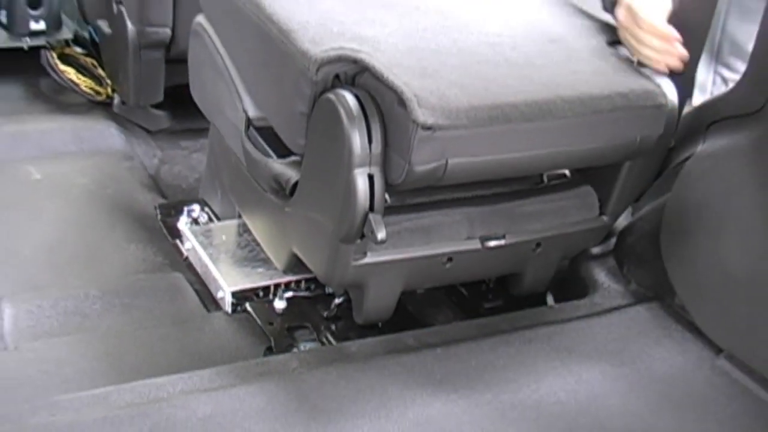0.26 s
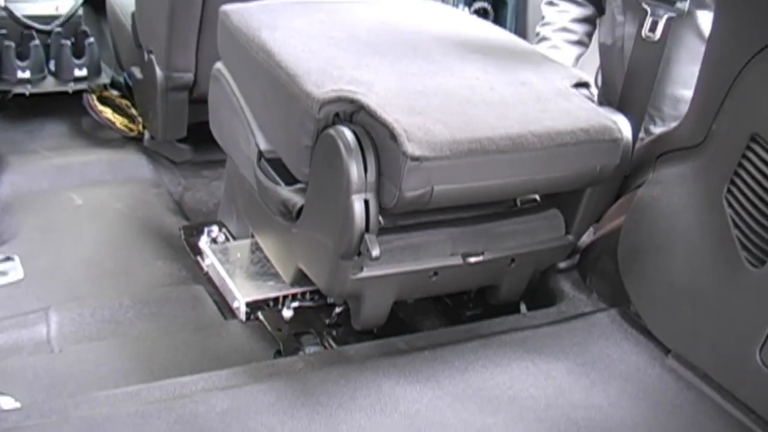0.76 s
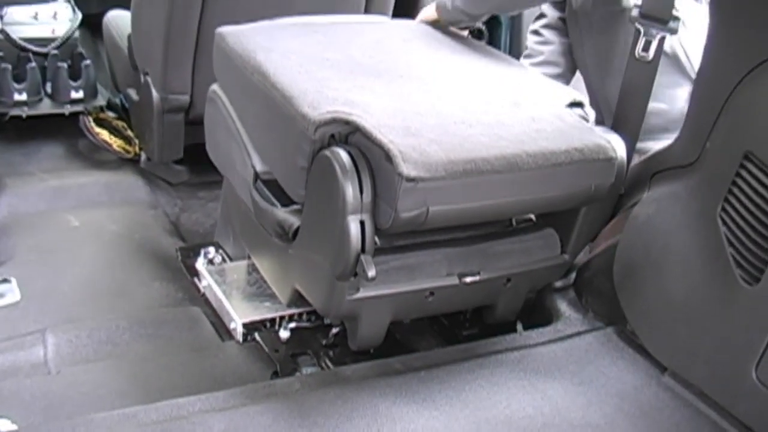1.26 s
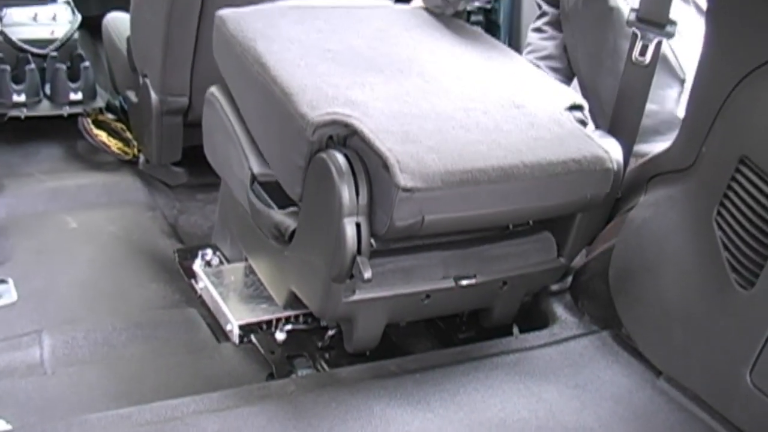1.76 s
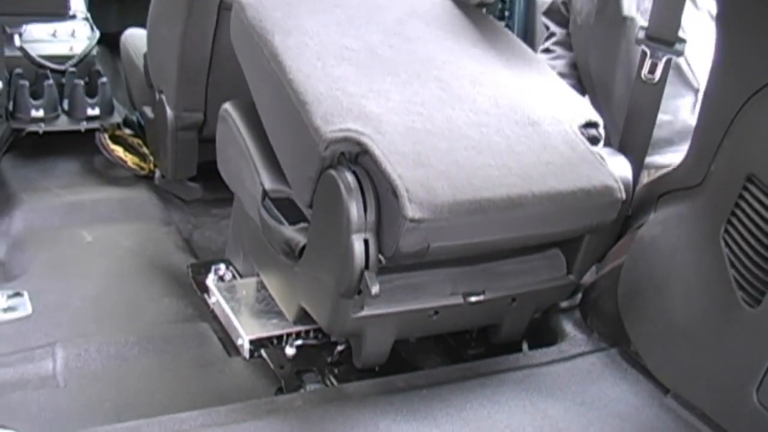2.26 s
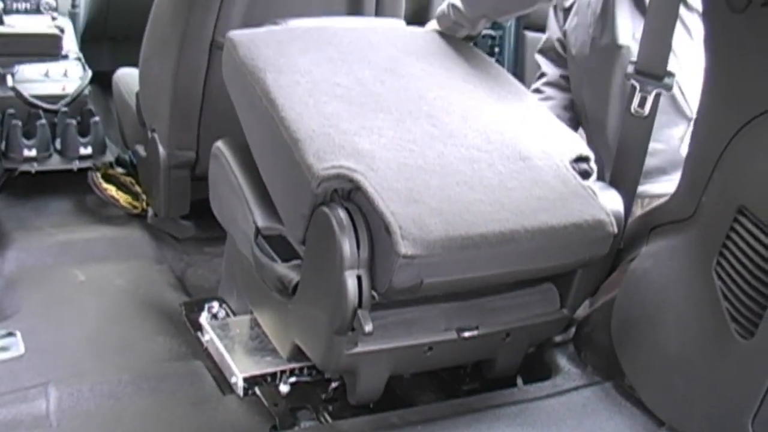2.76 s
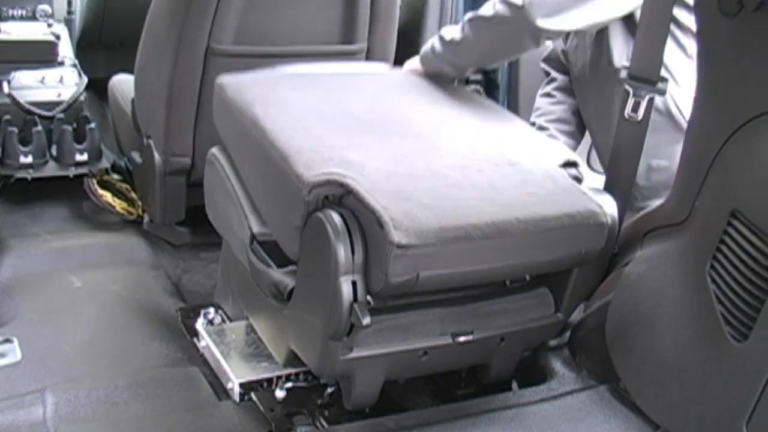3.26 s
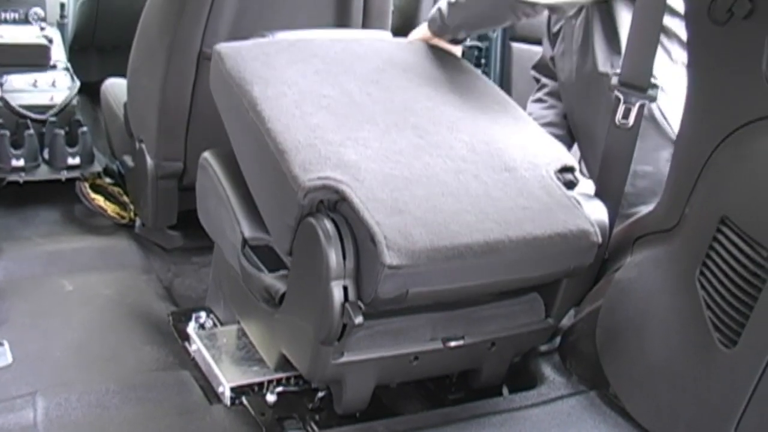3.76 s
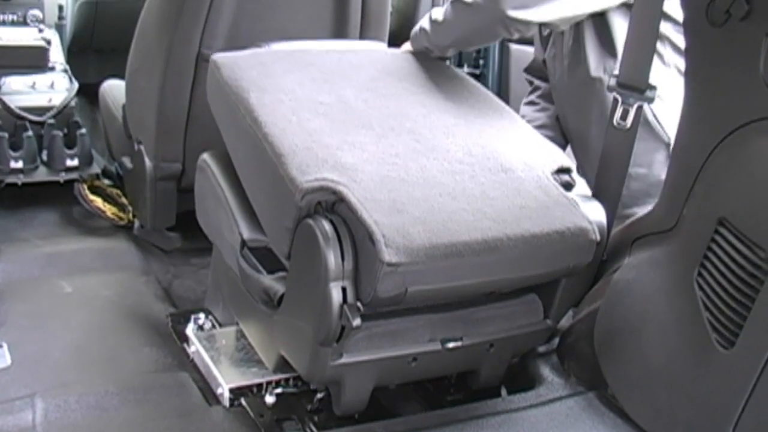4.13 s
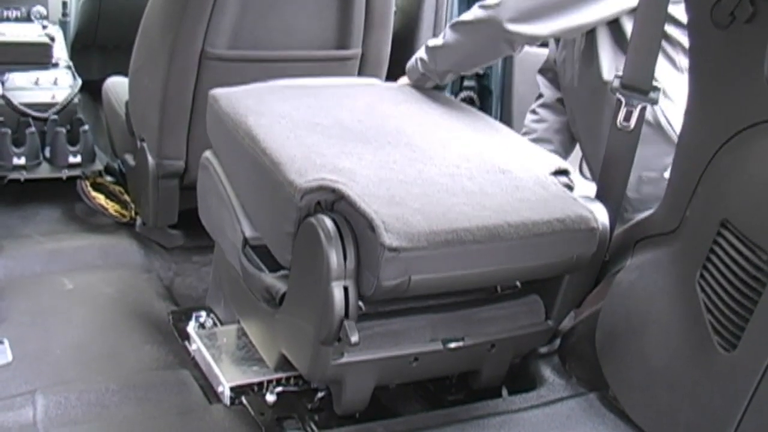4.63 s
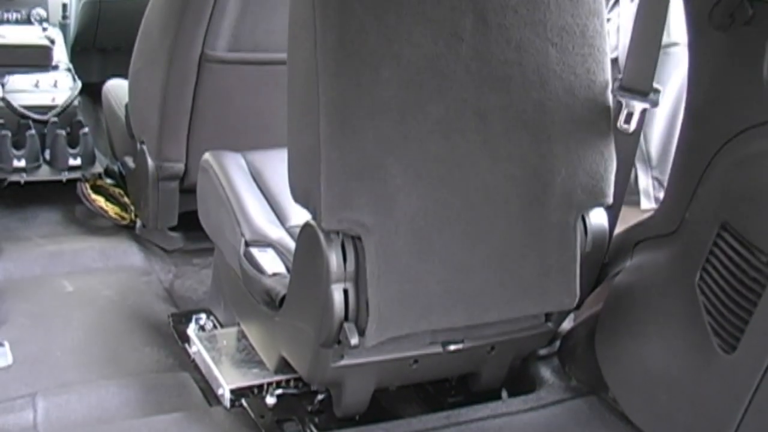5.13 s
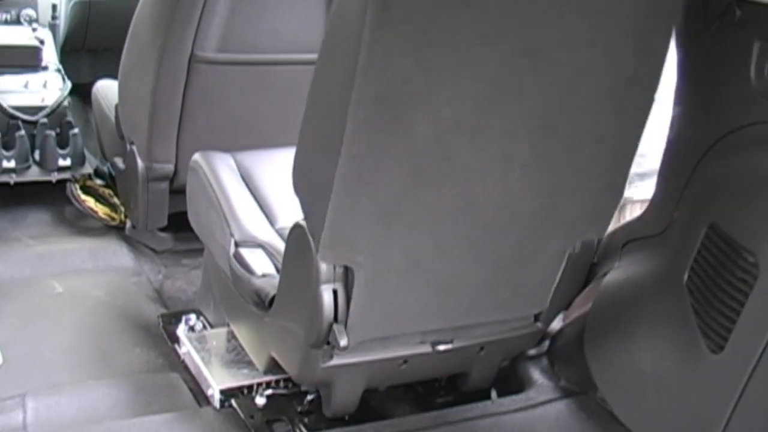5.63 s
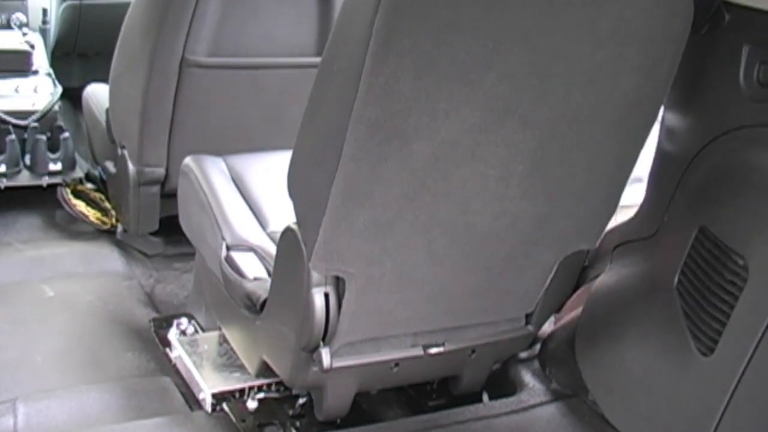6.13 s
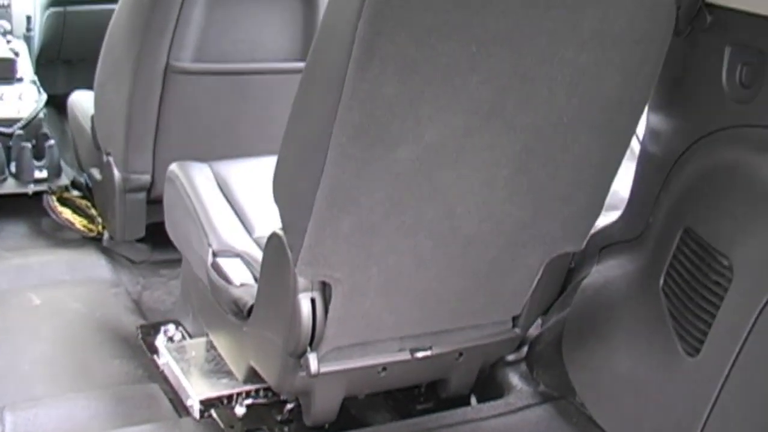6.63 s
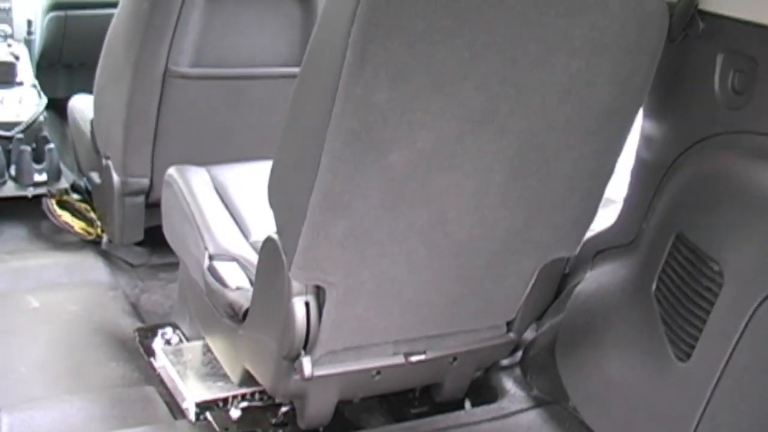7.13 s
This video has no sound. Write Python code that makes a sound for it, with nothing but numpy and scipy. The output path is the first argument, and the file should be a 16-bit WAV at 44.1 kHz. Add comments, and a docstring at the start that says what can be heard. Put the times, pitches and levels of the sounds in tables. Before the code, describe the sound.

Inside a van, a folding seat lands with a heavy, overloaded clunk that booms through the floor and jangles loose metal. Fabric and a sleeve rustle while hinges tick and the backrest knocks its stops, with a sharp latch clank midway. It swings up with a quick dull shudder, bangs into its catch, rings briefly, then locks with a final thud. Close mono microphone, faint low hum.

```python
"""A heavy clunk comes first: a van's folding rear seat drops onto the floor, which booms and jangles.
Its backrest is then rocked against its stops, swings up with a shudder, bangs into the catch and locks.
Impacts sum struck modes, decaying thuds and filtered noise; cloth is grainy noise in swelling strokes.
A wavering hum lies beneath; a close microphone inside the cabin hears it in mono and overloads on the clunk."""
import sys
import numpy as np
from scipy import signal
from scipy.fft import rfft, irfft, next_fast_len
from scipy.io import wavfile
from scipy.ndimage import uniform_filter1d, map_coordinates

SR = 44100
rng = np.random.default_rng(int(sys.argv[2]) if len(sys.argv) > 2 else 0)


def dump_mix(stems):
    """Bounce the given channels to the path in sys.argv[1] as a 16-bit WAV at rate SR."""
    frames = np.atleast_2d(stems).T  # one column per channel
    limited = np.clip(frames, -1, 1)  # hard clip at full scale
    pcm = np.round(limited * 32767).astype(np.int16)
    wavfile.write(sys.argv[1], SR, pcm)


N = 325899
TIME = np.arange(N) / SR  # the whole scene, s
RING = np.arange(2 ** 13) / SR  # time axis of one impact, s


def amp(db):
    """Logarithmic level: decibels become an amplitude ratio."""
    return 10 ** (np.asarray(db) / 20)


def unit(x):
    """Power normalisation: a steady sound is scaled to rms 1."""
    return x / np.sqrt(np.mean(x ** 2) + 1e-20)


def burst(x):
    """Energy normalisation: an impact is given the energy of 10 ms at rms 1."""
    energy_of_10_ms = SR / 100
    return x / np.sqrt(np.sum(x ** 2) / energy_of_10_ms + 1e-20)


def along(points, hz):
    """Logarithmic frequency scale: (Hz, value) points are interpolated on it."""
    f, value = np.transpose(points)
    return np.interp(np.log(hz + 1), np.log(f + 1), value)


def curves(rows):
    """Linear interpolation in time: one value per sample for each column after the time."""
    s, *columns = np.transpose(rows)
    return [np.interp(TIME, s, column) for column in columns]


def wobble(rate):
    """Slow random modulation: a smooth curve through random knots, rate of them a second."""
    knots = rng.standard_normal(int(N * rate / SR) + 4)
    return map_coordinates(knots, [TIME * rate])


def add(track, s, sound):
    """Superposition: a sound is mixed into the track at time s."""
    part = track[max(round(s * SR), 0):][:len(sound)]
    part += sound[:len(part)]


def coloured(x, spectrum):
    """Minimum-phase filtering: folding the cepstrum makes the filter with this spectrum causal."""
    size = 2 * next_fast_len(len(x) // 2 + 1)
    gain = amp(along(spectrum, np.fft.rfftfreq(size, 1 / SR)))
    cepstrum = irfft(np.log(gain))
    cepstrum[1:size // 2] *= 2
    cepstrum[size // 2 + 1:] = 0
    response = np.exp(rfft(cepstrum))
    return irfft(rfft(x, size) * response)[:len(x)]


def fade(t, t60):
    """Exponential damping: the amplitude falls by 60 dB in t60 seconds."""
    return np.exp(-np.log(1000) * t / t60)


def ring(modes, attack, t=RING, scatter_db=2):
    """Modal synthesis: damped sines with random phases, struck at new strengths each time."""
    hz, db, t60 = np.transpose(modes)[:, :, None]
    gain = amp(db + scatter_db * rng.standard_normal(hz.shape))
    phase = 2 * np.pi * rng.random(hz.shape)
    partials = gain * fade(t, t60) * np.sin(2 * np.pi * hz * t + phase)
    onset = 1 - np.exp(-t / attack)
    return burst(partials.sum(0) * onset)


def clatter(spectrum, scrape, t60, spiky=0.54, t=RING):
    """Stochastic excitation of dense modes: parts chatter while they scrape, then the sound decays."""
    force = rng.standard_normal(len(t)) * np.exp(spiky * rng.standard_normal(len(t)))
    decay = fade(np.maximum(t - scrape, 0), t60)
    return burst(coloured(force * decay, spectrum))


def thud(hz, cycles, attack):
    """Damped mass-spring oscillator: the padded seat bounces on its mounts, losing 60 dB in these cycles."""
    onset = 1 - np.exp(-RING / attack)
    return burst(np.sin(2 * np.pi * hz * RING) * fade(RING, cycles / hz) * onset)


# Course of the hum's strength: t/s, relative level/dB
HUM_COURSE = [(0.4, -45.5), (0.8, -48), (3.2, -49), (4.1, -47), (4.75, -44), (6.3, -47.5), (7.39, -52)]
# Spectrum of the rumble and faint hiss: f/Hz, relative level/dB
RUMBLE_SPECTRUM = [(20, -19), (40, -4.5), (72, 1), (120, -9), (225, -15.5), (300, -25), (490, -26.5),
                   (900, -34), (2500, -43.5), (15000, -65)]


def hum():
    """Random amplitude and phase modulation: a wavering low drone in broadband rumble and faint hiss."""
    level_db, = curves(HUM_COURSE)
    swell = amp(-4.5 + 2 * wobble(2.87))
    tone = swell * np.sin(2 * np.pi * 70 * TIME + 1.0 * wobble(3.4))
    rumble = amp(2.0) * unit(coloured(rng.standard_normal(N), RUMBLE_SPECTRUM))
    return amp(level_db) * (tone + rumble)


# Reverberation time of the cabin: f/Hz, t60/s
CABIN_DECAY = [(80, 0.48), (400, 0.25), (1500, 0.13), (5000, 0.19), (14000, 0.14)]


def cabin(x):
    """Diffuse reverberation: convolution with decaying noise, longest in the bass of the carpeted cabin."""
    noise = rng.standard_normal(2 * len(RING))
    hz, t, z = signal.stft(noise, SR, nperseg=256)
    decay = fade(t, along(CABIN_DECAY, hz)[:, None])
    tail = signal.istft(z * decay, SR, nperseg=256)[1]
    tail = tail * (1 - np.exp(-np.arange(len(tail)) / SR / 0.0033))  # the reflections build up
    return signal.fftconvolve(x, tail / np.linalg.norm(tail))[:N]


# Strokes of the arm: peak t/s, rise/s, fall/s, relative upholstery level/dB, relative sleeve level/dB
ARM_STROKES = [(.34, 0.24, .15, -53.5, -51), (.8, .22, 0.66, -59, -54), (1.59, 0.63, 0.27, -58.5, -50),
               (2.125, 0.24, 0.097, -54.5, -50.5), (2.34, 0.084, 0.11, -63, -55),
               (2.6, 0.29, 0.26, -66, -57), (2.82, 0.089, 0.14, -60.5, -56), (3.27, 0.28, 0.24, -57.5, -54),
               (3.48, .043, 0.043, -56.5, -48.5), (3.65, 0.14, 0.23, -53, -49),
               (4.32, 0.19, 0.06, -59, -53.5), (4.56, 0.25, .18, -57, -52), (4.84, 0.13, .21, -45, -47),
               (5.16, .065, .11, -56.5, -48), (5.31, .09, 0.15, -69, -59.5),
               (5.655, .14, .115, -53.5, -48.2), (6.08, 0.08, 0.025, -57, -55.5),
               (6.4, .31, 0.6, -60.5, -57), (6.86, .03, .04, -74, -60.5)]
# The arm at rest: relative upholstery level/dB, relative sleeve level/dB
ARM_AT_REST = (-65, -72.5)
STROKE_EDGE_DB, STROKE_SHAPE = 10, 1.44  # level lost over the rise or fall time; roundness of the swell


def stroke_levels():
    """Addition of powers: every stroke swells and dies away over the resting arm; levels in dB."""
    t = TIME[::100]
    power = amp(ARM_AT_REST)[:, None] ** 2
    for s, rise, fall, *levels_db in ARM_STROKES:
        away = np.maximum((s - t) / rise, (t - s) / fall)
        stroke_db = np.array(levels_db)[:, None] - STROKE_EDGE_DB * away ** STROKE_SHAPE
        power = power + amp(stroke_db) ** 2
    return curves(np.column_stack([t, *(10 * np.log10(power))]))


def rub(spectrum, patchy_db, grain):
    """Stick-slip friction: fibres catch and slip as grainy noise whose colour drifts in patches."""
    slips = rng.standard_normal(N) * np.exp(grain * rng.standard_normal(N))
    z = signal.stft(slips, nperseg=512)[2]
    patches = uniform_filter1d(rng.standard_normal(z.shape), size=16, axis=0)  # across frequency
    patches = uniform_filter1d(patches, size=14, axis=1)  # across time
    patchy = signal.istft(z * amp(patchy_db * unit(patches)), nperseg=512)[1][:N]
    return unit(coloured(patchy, spectrum))


# Friction spectrum of the seat cover: f/Hz, relative level/dB
COVER_SPECTRUM = [(100, -1.5), (330, 8.5), (520, 8), (800, 1), (1800, -2.5), (3500, -6), (8000, -15),
                  (15000, -29)]
# Friction spectrum of the jacket sleeve: f/Hz, relative level/dB
SLEEVE_SPECTRUM = [(800, -16), (2300, -3.5), (4200, 0.5), (7000, -1), (10300, 2), (15500, -0.5)]


def cloth():
    """Friction noise: upholstery scuffs dully and a jacket sleeve hisses as the arm works the backrest."""
    upholstery_db, sleeve_db = stroke_levels()
    scuffs_db = 1.0 * wobble(25) + 1.6 * wobble(140)
    cover_gain = amp(upholstery_db + 2.5 + scuffs_db)
    sleeve_gain = amp(sleeve_db + 2.5 + 0.51 * wobble(18))
    cover = cover_gain * rub(COVER_SPECTRUM, patchy_db=1.13, grain=0.62)
    sleeve = sleeve_gain * rub(SLEEVE_SPECTRUM, patchy_db=2.0, grain=0.51)
    return cover + sleeve


# Small ticks of hinges and springs: t/s, level/dB, centre f/Hz
SETTLING_TICKS = [(0.143, -44.5, 11000), (0.7621, -47, 1190), (0.959, -50.5, 1180), (1.783, -47, 647),
                  (1.866, -54, 2000), (2.442, -50, 11000), (2.443, -52.5, 450), (2.857, -57, 2000),
                  (2.938, -56, 900), (3.154, -53, 550), (3.572, -53.5, 3220), (3.8403, -48.5, 3200),
                  (4.003, -63, 1200), (4.037, -63, 3000), (4.177, -53.5, 3000), (4.585, -49, 3500),
                  (4.678, -48.5, 1200), (5.039, -45, 1100), (5.8744, -57.5, 4900), (5.9178, -57.5, 4900)]
RETICK_S, RETICK_LOSS_DB = 0.0051, 12.5  # delay and weakening of the second tick


def ticks():
    """Band-limited impulses: hinges and springs settle in dry double ticks, each around its own pitch."""
    out = np.zeros(N)
    for s, db, hz in SETTLING_TICKS:
        colour = [(hz / 8, -26), (hz / 2, -5), (hz, 0), (hz * 2, -8), (hz * 8, -30)]
        for k in range(2):
            tick = clatter(colour, scrape=0.00086, t60=0.0081)
            add(out, s + k * RETICK_S, amp(db - k * RETICK_LOSS_DB) * tick)
    return out


# The latch hook strikes its steel bar: t/s, level/dB, upper limit of the force f/Hz
LATCH_STRIKES = [(2.0807, -35, 800), (3.6839, -17.5, 5000)]
# Modes of the hook: f/Hz, relative level/dB, t60/s
HOOK_MODES = [(933, 1, 0.026), (1197, -9, .025), (1367, 3.5, 0.034), (2360, -2, .022), (3300, -7, 0.05),
              (3700, -5, 0.033), (4380, -16, 0.023)]


def latch():
    """Force bandwidth: the hook clanks on its bar, and a softer contact reaches only the lower modes."""
    out = np.zeros(N)
    for s, db, top_hz in LATCH_STRIKES:
        modes = []
        for hz, level_db, t60 in HOOK_MODES:
            modes.append((hz, level_db - 10 * np.log10(1 + (hz / top_hz) ** 6), t60))
        add(out, s, amp(db) * ring(modes, attack=0.00073, scatter_db=1))
    return out


# Tones of the backrest: onset t/s, f/Hz, level/dB, t60/s
BACKREST_TONES = [(5.248, 274.5, -53, 65), (5.727, 439.5, -15, 0.11), (5.742, 185.7, -47.5, 3.4),
                  (5.738, 160, -37.5, 1.74)]


def backrest():
    """Free vibration, then added damping: shell and springs ring on until the last blow locks them."""
    out = np.zeros(N)
    for s, hz, db, t60 in BACKREST_TONES:
        add(out, s, amp(db) * np.sin(2 * np.pi * hz * TIME) * fade(TIME, t60))
    locked_s = BACKREST_KNOCKS[-1][0]
    return out * fade(np.maximum(TIME - locked_s, 0), t60=0.11)


# Modes of the plastic trim panel: f/Hz, relative level/dB, t60/s
PANEL_MODES = [(376, -5, 0.05), (435, 2, 0.043), (490, -5.5, 0.069), (534, -2, 0.039), (619, -0.5, 0.029),
               (793, -10.5, 0.062)]
# Modes of the steel frame: f/Hz, relative level/dB, t60/s
FRAME_MODES = [(1087, -3, 0.087), (1215, 6.5, 0.032), (1543, -7, 0.041), (1940, -1, 0.023), (2260, 6, 0.04),
               (2990, -5.5, 0.021), (3520, -10, 0.15), (4940, -9, .08)]
# Dense-mode spectra of padding, trim and steel, and of the contact snap: f/Hz, relative level/dB
PADDING_SPECTRUM = [(25, -19.5), (55, -3), (150, 4.5), (260, -3.5), (400, -20), (900, -36), (3000, -62)]
TRIM_SPECTRUM = [(100, -16), (280, 1.5), (480, 1.5), (680, -3.5), (1000, -14), (3000, -47.5)]
STEEL_SPECTRUM = [(300, -28), (750, 0), (1300, 3), (2400, 1), (3800, -3.5), (6000, -11.5), (10000, -22),
                  (15000, -28)]
SNAP_SPECTRUM = [(600, -31), (2000, -4), (3600, 5), (5500, 2), (8000, -1), (11000, -0.5), (15500, -7.5)]
SNAP_SHARE = 0.45  # part of the scrape during which the contact snaps
PANEL_DULLS, SNAP_DULLS = 0.41, 1.4  # dB lost by trim and snap per dB that the frame loses


def blow(thud_db, thud_hz, panel_db, steel_db, snap_db, scrape, lag=0, dull_db=0):
    """Impact excitation: the contact snaps and shakes the steel; padded mass and trim follow after the lag."""
    mass = thud(thud_hz, cycles=7.6, attack=0.00082)
    mass = mass + amp(-4.5) * clatter(PADDING_SPECTRUM, scrape, t60=0.088)
    panel = amp(-3) * ring(PANEL_MODES, attack=0.00062)
    panel = panel + amp(-1.5) * clatter(TRIM_SPECTRUM, scrape, t60=0.046)
    frame = amp(-9.5) * ring(FRAME_MODES, attack=0.0007)
    frame = frame + amp(-1.5) * clatter(STEEL_SPECTRUM, scrape, t60=0.062)
    snap = clatter(SNAP_SPECTRUM, SNAP_SHARE * scrape, t60=0.033, spiky=0.48)
    bite = 1 - np.exp(-RING / 0.0012)  # the contact force builds up
    hard = amp(steel_db - dull_db) * frame + amp(snap_db - SNAP_DULLS * dull_db) * snap
    soft = amp(thud_db - 1.5) * mass + amp(panel_db - PANEL_DULLS * dull_db) * panel
    out = bite * hard
    add(out, lag, soft)
    return out


# Strongest jolt, before pitch scatter: relative thud level/dB, thud f/Hz, then relative levels of
# trim panel/dB, steel frame/dB and snap/dB, scrape/s (negative: no scraping)
STRONGEST_JOLT = (-20, 130, -44.5, -66, -72, -0.1)
SHUDDER_S, JOLT_GAP_S = 5.183, 0.0205  # first jolt; time between jolts
SHUDDER_EDGE_DB, JOLT_SPREAD = 11, 0.3  # thud weaker at first and last jolt; scatter of log pitch


def shudder(count=5):
    """Periodic impacts: the rising backrest gives evenly spaced dull jolts whose thuds swell and fade."""
    out = np.zeros(N)
    thud_db, thud_hz, *parts = STRONGEST_JOLT
    for k, place in enumerate(np.linspace(-1, 1, count)):
        hz = thud_hz * np.exp(JOLT_SPREAD * rng.standard_normal())
        jolt = blow(thud_db - SHUDDER_EDGE_DB * place ** 2, hz, *parts)
        add(out, SHUDDER_S + k * JOLT_GAP_S, jolt)
    return out


# Knocks of the backrest: t/s, play/s, first touch relative to the knock/dB, body lag/s,
# relative thud level/dB, thud f/Hz, relative levels of trim panel/dB, steel frame/dB and snap/dB,
# scrape/s, rebound relative to the knock/dB
BACKREST_KNOCKS = [(1.729, .015, -9, 0, -40, 194, -45.5, -45, -46, 0.013, -8),
                   (1.755, .007, -14, 0.0003, -42.5, 185, -44.5, -46.5, -48.5, .011, -4),
                   (2.079, .015, -10.5, 0.0015, -35.5, 209, -36.5, -37, -52, 0.0065, -10),
                   (2.3041, .015, -11, 0.012, -35.5, 198, -30.5, -35.5, -36, 0.021, -9),
                   (2.787, 0.0062, -12, .009, -33, 151, -43.5, -46, -45.5, .009, -12),
                   (2.829, 0.0036, -11, 0, -45, 190, -45, -48.5, -64, 0.0097, -12),
                   (3.3378, 0.0051, -14, 0.0033, -25.5, 118, -33.5, -42.5, -35, 0.0088, -12),
                   (3.6848, 0.0069, -8.5, .003, -21, 121, -24.5, -22, -26.5, 0.018, -3),
                   (4.2145, 0.0088, -17.5, 0.0065, -34, 200, -26.5, -31.5, -30, .011, -15),
                   (4.406, .005, -7.5, .002, -34.5, 199, -40, -46, -52, 0.02, -11),
                   (5.034, .003, -18, 0, -39.5, 342, -42, -54, -69, .0025, -22),
                   (5.072, .003, -22, 0.00035, -41.5, 335, -42, -47, -49, 0.007, -20),
                   (5.7253, .008, -20, .001, -31, 350, -22.5, -34, -73, .007, -22),
                   (5.74, 0.0064, -14, 0, -14, 151, -21.5, -25, -28.5, .025, -10),
                   (6.6915, 0.012, -11, 0, -16, 128, -28, -29.5, -30.5, .001, -24)]
REBOUND_S, REBOUND_DULL_DB = 0.042, 21  # the cushioned second contact: delay, loss of the steel frame


def knocks():
    """Impact with play and rebound: a light touch takes up the hinge, the stop is hit, a soft rebound follows."""
    out = np.zeros(N)
    for s, play, touch_db, lag, thud_db, *contact, rebound_db in BACKREST_KNOCKS:
        add(out, s - play, amp(touch_db) * blow(thud_db, *contact))
        add(out, s, blow(thud_db, *contact, lag=lag))
        rebound = blow(thud_db, *contact, dull_db=REBOUND_DULL_DB)
        add(out, s + REBOUND_S, amp(rebound_db) * rebound)
    return out


DROP_S = 0.00046  # first touch of the dropped seat
# Separate modes of the floor pan: f/Hz, relative level/dB, t60/s
FLOOR_MODES = [(56, 4.5, 0.44), (98, -0.5, 0.46), (148, 0.5, 0.65), (179.4, -5, 0.83), (232.5, -8, .35),
               (291.7, 4, 0.29), (345.3, -7.5, 0.53), (411.6, -5.5, 0.73)]
# Spectrum of the floor's dense modes: f/Hz, relative level/dB
BOOM_SPECTRUM = [(40, -22.5), (150, 3), (260, -2), (430, -4.5), (620, -19.5), (1500, -43.5)]


def floor_boom():
    """Plate resonance: the floor pan booms under the dropped seat, and loose steel parts jangle on it."""
    out, t = np.zeros(N), TIME[:SR]
    modes = amp(-7.5) * ring(FLOOR_MODES, attack=0.0062, t=t, scatter_db=0.5)
    boom = amp(-15.5) * clatter(BOOM_SPECTRUM, scrape=0.02, t60=0.68, t=t)
    jangle_gain = amp(-26.5 + 1.9 * wobble(130)[:SR])
    jangle = jangle_gain * clatter(STEEL_SPECTRUM, scrape=0.023, t60=0.46, t=t)
    add(out, DROP_S, modes + boom + jangle)
    return out


# First contact of the landing seat: relative thud level/dB, thud f/Hz, then relative levels of
# trim panel/dB, steel frame/dB and snap/dB, scrape/s
FIRST_CONTACT = (-11, 139.5, -12.5, -11.5, -15.5, 0.0171)
DROP_GAP_S, GAP_GROWS = 0.0105, 1.28  # wait for the second contact; each wait over the last
DROP_LOSS_DB, DROP_DULL_DB, DROP_SINKS = 2.24, 4, 0.79  # per contact: weaker, duller, thud pitch ratio


def drop(count=5):
    """Successive impacts losing energy: foot after foot lands at widening gaps, weaker, duller and deeper."""
    out, s = np.zeros(N), DROP_S
    thud_db, thud_hz, *parts = FIRST_CONTACT
    for k in range(count):
        contact = blow(thud_db, thud_hz * DROP_SINKS ** k, *parts, dull_db=DROP_DULL_DB * k)
        add(out, s, amp(-DROP_LOSS_DB * k) * contact)
        s += DROP_GAP_S * GAP_GROWS ** k
    return out


def scene():
    """Superposition of sources: seat, cabin, cloth and hum, the same in both channels."""
    seat = drop() + knocks() + shudder() + latch() + ticks()
    background = cloth() + hum()
    mono = seat + amp(-13) * cabin(seat) + floor_boom() + backrest() + background
    return np.array([mono, mono])


def record(dry, ceiling=0.51, low_cut_hz=28, top_hz=15800):
    """Saturation and band limiting: the microphone stage overloads, then loses deep bass and top treble."""
    clipped = dry / (1 + (dry / ceiling) ** 6) ** (1 / 6)
    size = next_fast_len(N + SR // 2)
    hz = np.fft.rfftfreq(size, 1 / SR)
    high_pass = 1j * hz / (low_cut_hz + 1j * hz)
    return irfft(rfft(clipped, size) * high_pass * (hz < top_hz), size)[:, :N]


dry = scene()
out = record(dry)
dump_mix(out)
```